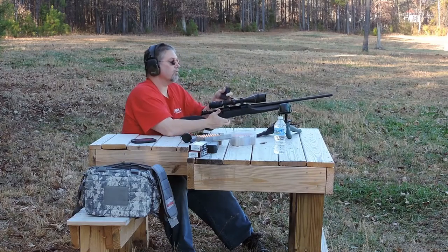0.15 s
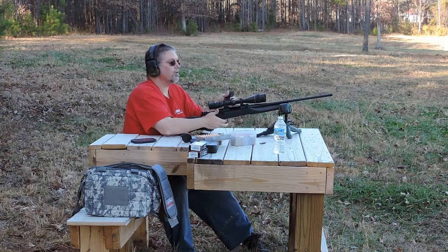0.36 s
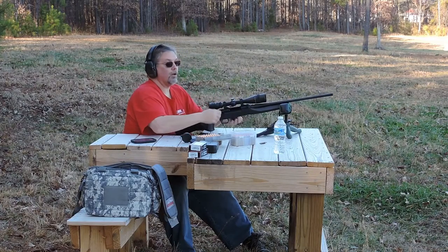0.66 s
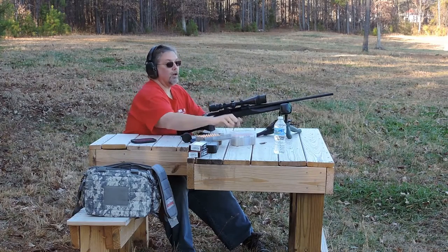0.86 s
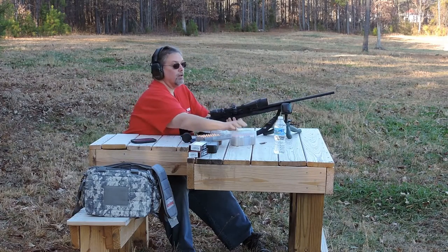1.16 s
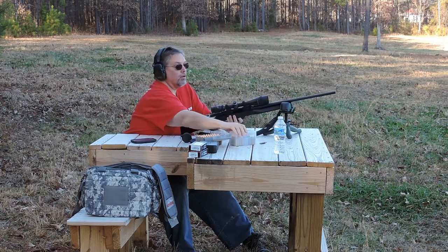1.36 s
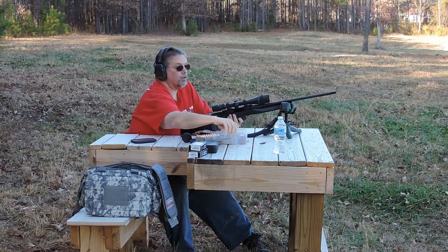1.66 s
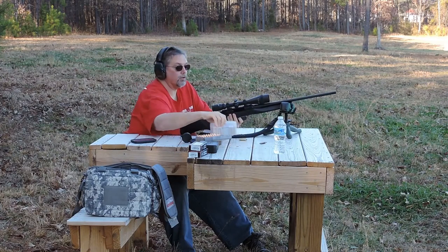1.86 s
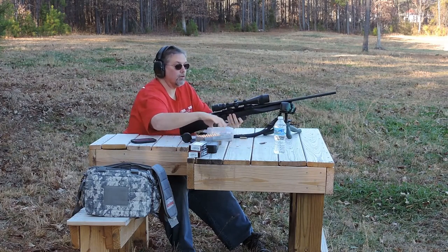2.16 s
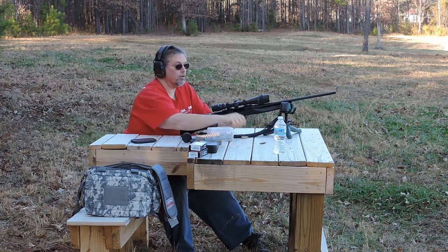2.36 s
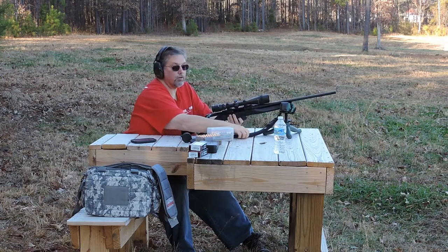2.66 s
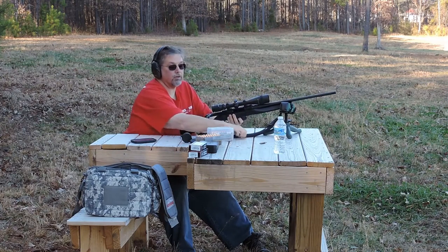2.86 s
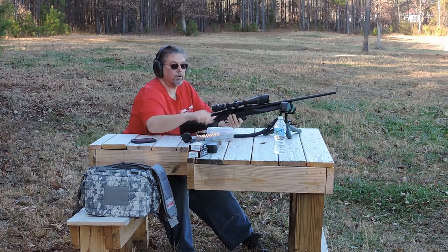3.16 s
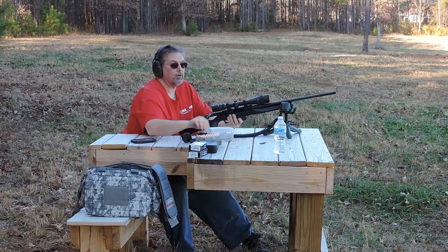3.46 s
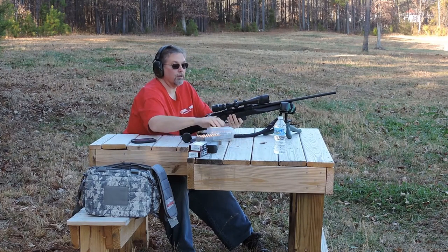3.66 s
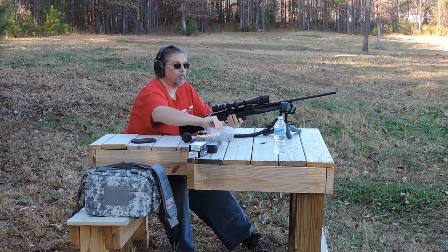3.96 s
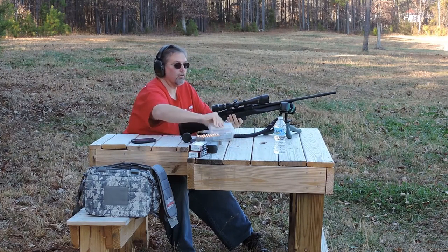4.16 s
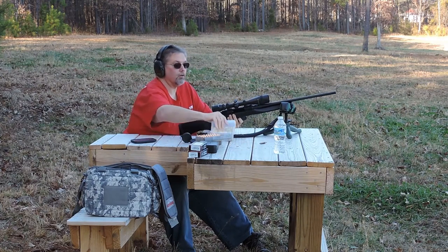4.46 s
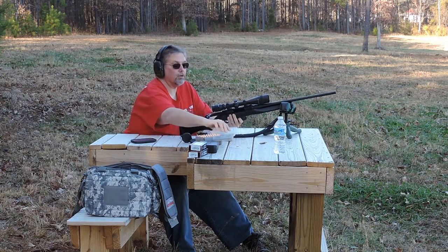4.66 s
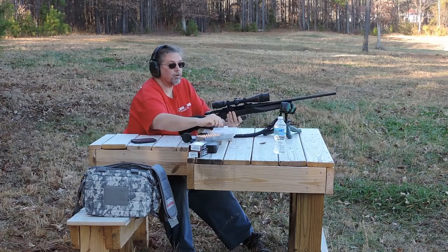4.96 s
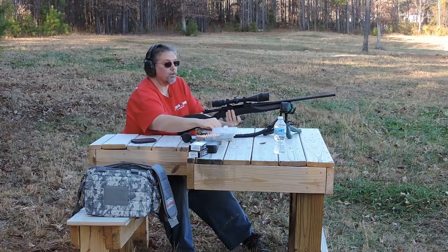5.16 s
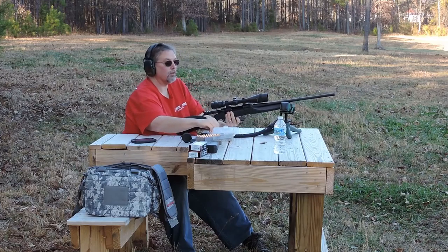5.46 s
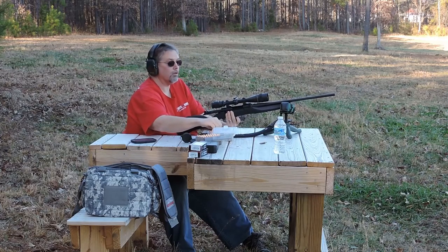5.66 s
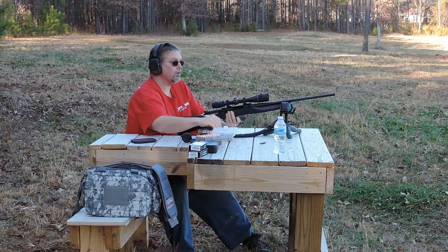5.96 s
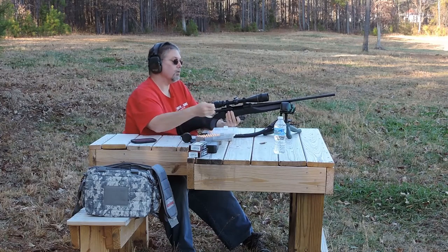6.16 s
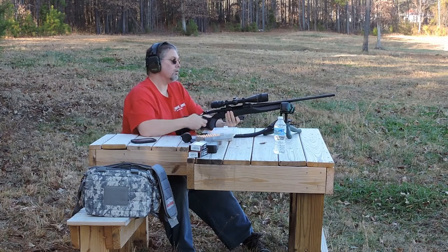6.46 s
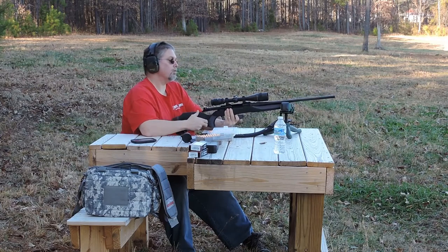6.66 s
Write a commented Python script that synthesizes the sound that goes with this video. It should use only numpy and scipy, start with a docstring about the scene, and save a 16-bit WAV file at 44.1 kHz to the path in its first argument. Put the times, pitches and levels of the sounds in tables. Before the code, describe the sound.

Fingers pick through metal cartridges in a thin plastic box on a plank bench. Sparse ticks grow into rattling, peaking in a double clack on wood and plastic just after two seconds. Near-silence follows, then a bright brass click, a busy box clatter and light dwindling touches. Outdoors, dry and close in stereo, with very quiet, fading road noise, a faint engine hum, early bird chirps and slight microphone hiss.

```python
"""Road hiss and a far vehicle's drone last throughout, under hands at work on a wooden bench on an open lawn.
Cartridges shift in a plastic box, knock the bench and click on steel: chattering contacts excite damped modes
of planks, box, shells and small metal parts, and a brass case rings on. A far bird whistles softly.
Road hiss is filtered noise, the drone two gliding partials; each microphone port adds its own noise."""
import sys
import numpy as np
from scipy import signal
from scipy.fft import rfft, irfft
from scipy.io import wavfile
from scipy.ndimage import uniform_filter1d

SR = 44100
rng = np.random.default_rng(int(sys.argv[2]) if len(sys.argv) > 2 else 0)


def wav_out(sig):
    """Save sig, one row per channel (or a flat mono array), as 16-bit PCM at SR to the path in sys.argv[1]."""
    wavfile.write(sys.argv[1], SR, np.round(np.clip(np.atleast_2d(sig).T, -1, 1) * 32767).astype(np.int16))


N = 301140

# road hiss spectrum, relative: f/Hz, density level/dB
ROAD_SPECTRUM = [(15, -56.5), (25, -23), (90, -6.5), (144, -11.5), (161, -15.5), (235, -16), (280, -19.5),
                 (427, -17.5), (533, -20), (636, -17.5), (1260, -18.5), (1510, -20), (2750, -32),
                 (5000, -48.5), (6500, -70.5), (11000, -120)]
# far vehicle: t/s, rms level of second partial/dB, rms level of third partial/dB, both before wavering
DRONE_LEVELS = [(0.05, -62.5, -68), (0.57, -64.5, -62), (2.17, -64, -67), (2.4, -65, -77),
                (2.9, -68.5, -77.5), (4.551, -87, -79), (4.77, -67, -80), (5.45, -72.5, -83),
                (6.43, -64.5, -79), (6.83, -79, -79)]
# far bird: t/s (0.3 of the length into the whistle), peak level/dB, nominal f/Hz, length/s
BIRD_CHIRPS = [(0.404, -60.5, 1560, 0.042), (0.468, -62.5, 1460, 0.046), (0.848, -62, 1560, 0.043),
               (0.88, -61, 1428, 0.047), (1.321, -63, 1540, 0.044), (1.355, -68, 1393, 0.049),
               (2.761, -63, 1437, 0.048), (2.82, -61.5, 1485, 0.048)]
# damped modes of each body, before the struck spot weights them: f/Hz, level/dB, t60/s
PLANK_MODES = [(165, -6, .06), (224, -2, .09), (286, 0, .11), (322, -7, .09), (357, -2, .09),
               (425, -10, .06)]
BOX_MODES = [(533, -5.5, 0.037), (679, 0, 0.021), (796, -3.5, 0.024), (952, -10, 0.034), (1094, -1, 0.031),
             (1178, 2.5, 0.021), (1314, 0, 0.027), (1470, 3.5, 0.012)]
SHELL_MODES = [(1797, 7, 0.02), (2008, 3, .03), (2439, 2, 0.017), (2678, -7, 0.035), (2996, 5, 0.0084),
               (3607, -1.5, 0.012), (3880, -2.5, 0.012), (4200, -3.5, 0.011), (5010, -7, .006)]
METAL_MODES = [(4664, -0.5, 0.006), (5320, -4, 0.008), (5880, 1, 0.0044), (6960, -4, 0.0045),
               (7970, 0, 0.0031), (9170, -5, .004), (9840, -3.5, 0.0043), (11750, -1.5, 0.002),
               (13600, -7.5, .003), (15200, -9, .003)]
BRASS_MODES = [(11030, -3, .21), (11530, -11, .05), (15620, -5, .16)]
# fingers stir the cartridges; each move swells and dies away: t/s at its height, box rms level/dB,
# rise/(ms per 20 dB), fall/(ms per 20 dB), planks minus box level/dB, shells minus box level/dB
STIR_MOVES = [(1.2, -78.5, 64, 98, -10, 6.5), (1.5, -68, 248, 300, 0, -11), (1.58, -50, 54.5, 84, -13, -9),
              (1.7, -46, 28, 215, -5, -7.5), (1.975, -57, 26, 34, -18, -16),
              (2.035, -48.5, 19.5, 63, -17, -11), (2.23, -32, 12, 30, 3, -8.5),
              (2.264, -38.5, 62.5, 65, -9.5, -10), (2.33, -66.5, 30, 300, 3, -6.5),
              (3.59, -66.5, 20, 150, 2, 1), (3.671, -47, 19, 15, -13, -19), (3.714, -58, 12, 26, -16, -14),
              (3.8, -68.5, 298.5, 403, -10, -11), (4.25, -58, 102, 303, -14, -16),
              (4.352, -32.5, 31, 36, -9, -11), (4.396, -44, 60, 25, -2, -10),
              (4.485, -50, 144, 25, -10, -15), (4.53, -64, 38, 203, 3, -19),
              (4.755, -41.5, 20, 59, -9, -16.5), (5.433, -64, 37, 38, -15.5, -5),
              (5.48, -49, 25, 28, -5, -17)]
# bounces of the brass case: t/s, peak level/dB, favoured f/Hz
BRASS_BOUNCES = [(1.749, -71, 10500), (3.571, -49, 14400), (3.679, -59.5, 10500), (3.8533, -65, 10500)]
# contacts: t/s, peak level/dB of shell, of planks, of box, of metal,
# chatter decay constant/ms, favoured f/Hz of box, favoured f/Hz of shell
KNOCK_CONTACTS = [(0.2301, -89, -34.5, -39, -75, 2.5, 670, 2100),
                  (0.5862, -51, -70, -48.5, -50.5, 5.1, 1210, 3070),
                  (0.6193, -59, -72, -51, -60, 1.8, 1080, 3900), (0.843, -52, -79, -51, -51, 2, 759, 2200),
                  (0.9617, -53.5, -84, -70, -58.5, 1.7, 678, 4070),
                  (0.984, -63, -81, -70, -64, 2, 1050, 4500),
                  (1.1289, -41.5, -69, -39.5, -35.5, 4.9, 900, 3420),
                  (1.1513, -44, -74, -43.5, -42, 4.2, 1180, 2920),
                  (1.4737, -58, -52, -49.5, -68, 2.1, 1190, 2120),
                  (1.5289, -48.5, -58, -53, -65, 2, 1200, 2360),
                  (1.5581, -47.5, -66, -44, -59, 2.1, 703, 2010),
                  (1.5806, -41, -50.5, -43.5, -55.5, 5.8, 540, 2250),
                  (1.6124, -47, -56, -63, -71, 1.7, 1100, 2030),
                  (1.699, -51, -68, -55, -47, 1.3, 1240, 2020),
                  (1.715, -31.5, -36, -33, -46, 4.7, 1500, 2500),
                  (1.7338, -37, -68, -40, -56, 7.7, 583, 2170),
                  (1.7489, -47, -47, -36.5, -54, 5.7, 696, 3060),
                  (1.7755, -58, -58, -55, -62, 3, 1230, 4000), (1.8198, -46, -78, -42, -48, 2.1, 616, 2300),
                  (1.8286, -45.5, -58, -43, -68, 2.4, 1110, 2260),
                  (1.869, -64, -49.5, -52, -76, 2.4, 1240, 2380),
                  (1.897, -51, -73, -49.5, -64, 11, 1170, 2090),
                  (1.9641, -56, -58.5, -52, -78, 4, 1230, 3000),
                  (2.0233, -53, -61, -46, -70, 1.4, 1220, 2020),
                  (2.0445, -49.5, -62, -61, -71, 3.9, 1360, 2110),
                  (2.2077, -33, -18, -31, -37, 4, 1200, 2480),
                  (2.222, -18.5, -21.5, -18, -29.5, 4.8, 765, 2580),
                  (2.2378, -44, -27, -44, -50, 5.7, 580, 2060),
                  (2.2649, -34.5, -49, -33, -49, 10.5, 560, 2090),
                  (2.2975, -28.5, -39.5, -33, -68, 1.17, 1050, 2320),
                  (2.615, -67, -44, -45.5, -70, 8.9, 550, 2050),
                  (3.5687, -30.5, -44.5, -34, -38.5, 5.4, 1020, 3380),
                  (3.5874, -47, -60, -40.5, -66, 4.8, 580, 2920),
                  (3.6636, -39.5, -55, -36.5, -81, 2.5, 1100, 2930),
                  (3.6774, -65, -63, -61, -59, 2.2, 1080, 2600),
                  (3.707, -49, -64, -43, -75, 2.5, 1130, 2510),
                  (3.768, -51, -55.5, -44.5, -84, 9.3, 1150, 2900),
                  (3.788, -41.5, -75, -45, -55.5, 1.1, 1220, 2080),
                  (3.8533, -59, -66, -54, -57.5, 2.1, 1160, 2090),
                  (3.878, -75, -75, -65, -66, 2, 1170, 4500), (4.2302, -56, -58, -46.5, -63, 2, 1250, 2030),
                  (4.2636, -68, -63, -46, -64, 3.7, 1340, 2000),
                  (4.2946, -67, -71, -55, -74, 2.7, 1230, 2120),
                  (4.3289, -42, -63, -27.5, -47, 3.2, 795, 2080),
                  (4.3434, -32, -39, -22, -52, 13, 1300, 2190),
                  (4.3549, -37, -52, -26, -68, 3.9, 1200, 2050),
                  (4.3791, -53, -75, -22.5, -52, 12, 1230, 2030),
                  (4.3944, -33, -56, -25.5, -60, 2, 1170, 2070),
                  (4.4458, -46, -46, -40, -75, 2.8, 1100, 1980),
                  (4.4574, -60, -38.5, -56, -78, 2.7, 1500, 2380),
                  (4.483, -43, -47, -33, -59, 8.7, 1240, 1820),
                  (4.576, -59, -62, -53, -67, 5.5, 1240, 1990),
                  (4.5964, -79, -48.5, -54.5, -82, 10, 807, 2030),
                  (4.7313, -41, -45, -33, -64, 1.7, 850, 2050), (4.7451, -37, -49, -31, -67, 2, 1200, 2030),
                  (4.7637, -34.5, -45, -32.5, -70, 2.7, 1300, 1800),
                  (5.3964, -53, -56.5, -59, -84, 2.34, 1205, 1840),
                  (5.4247, -59, -61, -47.5, -71, 4.3, 1250, 2600),
                  (5.4627, -53, -42.5, -60, -76, 4.9, 720, 2010),
                  (5.479, -40.5, -49.5, -35, -80, 3.8, 1210, 1840),
                  (5.499, -60, -67, -51, -70, 2.4, 1200, 3000),
                  (5.648, -54, -61, -53, -73, 3.3, 1490, 2520),
                  (5.7223, -58, -61, -57, -76, 3.25, 1330, 2060),
                  (5.739, -63, -75, -70, -85, 1, 1330, 3600), (5.907, -64, -61, -64, -70, 4.6, 1170, 2970),
                  (5.9577, -56, -69, -59, -87, 2.4, 1270, 1860), (6.002, -60, -69, -62, -83, 3, 821, 2300),
                  (6.0805, -60, -48.5, -51, -90, 1.4, 545, 2020),
                  (6.0901, -65, -53, -49.5, -85, 4.3, 1220, 2020)]

# road: 500-2000 Hz rms level; the level sinks once the traffic has passed, the tilt above 1 kHz from the start
ROAD_DB, ROAD_PASSED_S, ROAD_FADE_DB_PER_S = -63.5, 1.79, 0.68
ROAD_TILT_DB_PER_OCTAVE, ROAD_DULLS_DB_PER_OCTAVE_PER_S = 2.08, 0.73
ROAD_LAG_S, ROAD_SPREAD_HZ = 0.00014, 3400  # right port behind left; coherence is halved here
# the firing rate sags as the vehicle leaves
DRONE_HZ, DRONE_SAG_HZ_PER_S, DRONE_LOWEST_HZ = 50.55, 1.6, 44.2
# modes build up within ONSET_CYCLES and weaken away from the favoured pitch
ONSET_CYCLES, AWAY_DB_PER_OCTAVE = 0.52, 20.5
PLANKS_AWAY_DB_PER_OCTAVE, METAL_AWAY_DB_PER_OCTAVE = 10.5, 8
PLANKS_HZ, METAL_HZ = 310, 5280  # favoured pitches
# a knock that reaches the planks through the box favours their higher modes (box minus planks level)
THROUGH_BOX_DB_PER_OCTAVE, THROUGH_BOX_MOST_DB = 32, 19
FIRST_TAP, BLOW_MS = 5.5, 0.13
STIR_PER_S, STIR_SCATTER_DB, STIR_MOST_DB = 2000, 4, 10
STIR_METAL_DB = -12  # against the shells
# white part of the port hiss, and the gain at the lowest frequencies
PORT_WHITE_DB, PORT_BASS_LIFT_DB = -77.5, 3.5
TOP_HZ = 15850


def undb(db):
    """Level definition: twenty decibels are a factor of ten in amplitude."""
    return 10 ** (np.asarray(db) / 20)


def unit(x):
    """Normalisation to unit root mean square."""
    return x / np.sqrt(np.mean(x ** 2))


def walk(rate):
    """Smoothed random process: levels held 1 / rate s and slewed twice; spread near 1."""
    k = int(SR / rate)
    steps = np.repeat(rng.standard_normal(N // k + 1), k)
    return 1.67 * uniform_filter1d(uniform_filter1d(steps, k), k)[:N]


def add(out, s, peak_db, sound):
    """Superposition: mixes a sound in at a time and peak level."""
    at = int(s * SR)
    scaled = sound * undb(peak_db) / np.abs(sound).max()
    out[at:at + len(sound)] += scaled[:len(out) - at]


def road():
    """Partial coherence: tyre hiss reaches the left port first and scatters in the treble; its bands flicker."""
    f, t = np.fft.rfftfreq(N, 1 / SR) + 1e-9, np.arange(N) / SR
    hz, db = np.transpose(ROAD_SPECTRUM)
    colour = undb(np.interp(np.log(f), np.log(hz), db))
    coherence = 1 / (1 + (f / ROAD_SPREAD_HZ) ** 1.55)
    left, other = rfft(rng.standard_normal((2, N)))
    right = coherence * left + np.sqrt(1 - coherence ** 2) * other
    right = right * np.exp(-2j * np.pi * f * ROAD_LAG_S)
    pair = np.array([left, right]) * colour
    middle = irfft(pair * ((f > 500) & (f < 2000)), N)
    pair /= np.sqrt(np.mean(middle ** 2))
    level_db = ROAD_DB - ROAD_FADE_DB_PER_S * np.maximum(t - ROAD_PASSED_S, 0)
    tilt_db = ROAD_TILT_DB_PER_OCTAVE - ROAD_DULLS_DB_PER_OCTAVE_PER_S * t
    out = 0
    # overlapping triangular bands, spaced half an octave about 1 kHz
    for octave in np.arange(-5.5, 3, .5):
        share = np.clip(1 - np.abs(np.log2(f / 1000) - octave) / .5, 0, 1)
        band_db = level_db + tilt_db * max(octave, 0) + 1.2 * walk(5.4)
        out = out + undb(band_db) * irfft(pair * share, N)
    return out


def drone():
    """Harmonic series: second and third partials of a firing rate waver on the way over the field."""
    s, second_db, third_db = np.transpose(DRONE_LEVELS)
    t = np.arange(N) / SR
    hz = np.maximum(DRONE_HZ - DRONE_SAG_HZ_PER_S * t, DRONE_LOWEST_HZ)
    phase = 2 * np.pi * np.cumsum(hz * (1 + 0.0073 * walk(7.5))) / SR
    second = undb(np.interp(t, s, second_db) + 1.3 * walk(7)) * np.sin(2 * phase)
    third = undb(np.interp(t, s, third_db) + 1.5 * walk(7)) * np.sin(3 * phase)
    return np.sqrt(2) * (second + third)  # rms to peak


def bird():
    """Frequency glide: soft whistles under a half-sine envelope sag a little in pitch."""
    out = np.zeros(N)
    for s, db, hz, length in BIRD_CHIRPS:
        t = np.arange(int(length * SR)) / SR
        cycles = hz * t * (1.04 - 0.0335 * t / length)
        add(out, s - .3 * length, db, np.sin(np.pi * t / length) * np.sin(2 * np.pi * cycles))
    return out


def ring(modes, best_hz=None, away_db=AWAY_DB_PER_OCTAVE):
    """Modal superposition: a tap excites damped modes, and the struck spot favours those near best_hz."""
    t = np.arange(SR // 5) / SR
    hz, db, t60 = np.transpose(modes)[:, :, None]
    if best_hz:
        db = db - away_db * np.abs(np.log2(hz / best_hz))
    # neighbouring modes swing in opposite sense and build up over a fraction of a cycle
    sense = (-1) ** np.arange(len(modes))[:, None]
    onset = sense * (1 - np.exp(-t * hz / ONSET_CYCLES))
    return np.sum(onset * undb(db - 60 * t / t60) * np.sin(2 * np.pi * hz * t), axis=0)


def strike(push, body):
    """Linear response: convolves the contact force with the body's impulse response."""
    return signal.fftconvolve(push, body)[:len(body)]


def stir():
    """Random impact process: many tiny contacts of scattered size ring the bodies while the fingers move."""
    hits = rng.random(N) < STIR_PER_S / SR
    scatter_db = np.minimum(STIR_SCATTER_DB * rng.exponential(size=N), STIR_MOST_DB)
    taps = unit(hits * rng.standard_normal(N) * undb(scatter_db))
    out, t = np.zeros(N), np.arange(N) / SR
    box, planks, shells = np.zeros((3, N))
    for s, db, rise_ms, fall_ms, planks_db, shells_db in STIR_MOVES:
        move = undb(db - 20 * np.abs(t - s) * 1000 / np.where(t < s, rise_ms, fall_ms))
        box += move
        planks += move * undb(planks_db)
        shells += move * undb(shells_db)
    metal = shells * undb(STIR_METAL_DB)
    for gain, modes in ((box, BOX_MODES), (planks, PLANK_MODES), (shells, SHELL_MODES), (metal, METAL_MODES)):
        body = ring(modes)
        out += signal.fftconvolve(gain * taps, body / np.sqrt(np.sum(body ** 2)))[:N]
    return out


def brass_case():
    """Light damping: the bouncing brass case rings on in its long-lived modes."""
    out = np.zeros(N)
    for s, db, hz in BRASS_BOUNCES:
        add(out, s, db, ring(BRASS_MODES, hz))
    return out


def knocks():
    """Impact excitation: contacts chatter for a few ms; heavy planks feel one blow and a smoothed rest."""
    out, t = np.zeros(N), np.arange(2048) / SR
    noises = rng.standard_normal((len(KNOCK_CONTACTS), len(t)))
    for row, noise in zip(KNOCK_CONTACTS, noises):
        s, shell_db, planks_db, box_db, metal_db, ms, box_hz, shell_hz = row
        fade = np.exp(-t / (ms / 1000)) * (1 - np.exp(-t / 0.00015))
        chatter = fade * noise * np.abs(noise) ** 1.14
        chatter[12] += FIRST_TAP  # a firm first touch
        blow = np.exp(-t / (BLOW_MS / 1000)) + 0.8 * fade * uniform_filter1d(noise, size=24)
        through_box_db = np.clip(box_db - planks_db, 0, THROUGH_BOX_MOST_DB)
        planks_hz = PLANKS_HZ * 2 ** (through_box_db / THROUGH_BOX_DB_PER_OCTAVE)
        add(out, s, shell_db, strike(chatter, ring(SHELL_MODES, shell_hz)))
        add(out, s, planks_db, strike(blow, ring(PLANK_MODES, planks_hz, PLANKS_AWAY_DB_PER_OCTAVE)))
        add(out, s, box_db, strike(chatter, ring(BOX_MODES, box_hz)))
        add(out, s, metal_db, strike(chatter, ring(METAL_MODES, METAL_HZ, METAL_AWAY_DB_PER_OCTAVE)))
    return out


def scene():
    """Radiation and reflection: small bodies lack deep bass, and the bench top sets the ports apart."""
    contacts = knocks() + brass_case() + stir()
    near = signal.lfilter(*signal.butter(2, 110, "high", fs=SR), contacts)
    # the bench top reflects the treble differently to each port, and the left port faces the hands
    treble = signal.lfilter(*signal.butter(2, 2600, "high", fs=SR), near)
    glance = rng.standard_normal(400) * np.exp(-np.arange(400) / 270.0)
    reflected = signal.fftconvolve(treble, glance / np.sqrt(np.sum(glance ** 2)))[:N]
    side = undb(-12.0) * reflected + 0.14 * treble
    return road() + drone() + bird() + near + np.array([side, -side])


def record(dry):
    """Independent noise: each port hisses on its own; a steep low-pass ends the sound just below 16 kHz."""
    white = rng.standard_normal(dry.shape)
    # adding part of the previous sample lifts the bass and lowers the treble
    hiss = white + (undb(PORT_BASS_LIFT_DB) - 1) * np.roll(white, 1, axis=1)
    low_pass = signal.ellip(10, .2, 60, TOP_HZ, fs=SR, output="sos")
    return signal.sosfilt(low_pass, dry + undb(PORT_WHITE_DB) * hiss)


dry = scene()
out = record(dry)
wav_out(out)
```